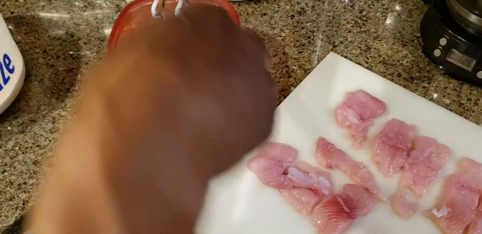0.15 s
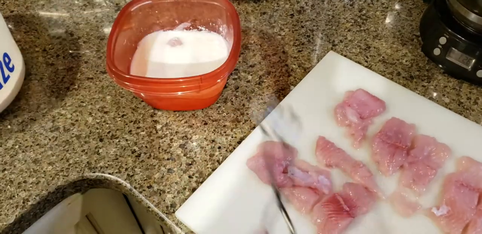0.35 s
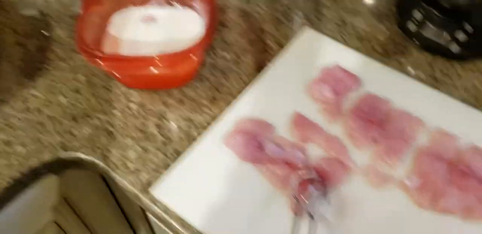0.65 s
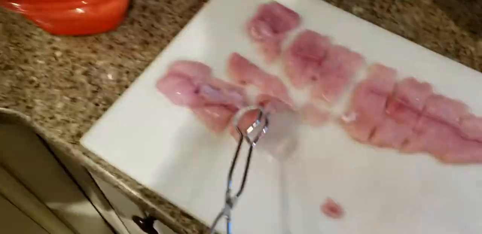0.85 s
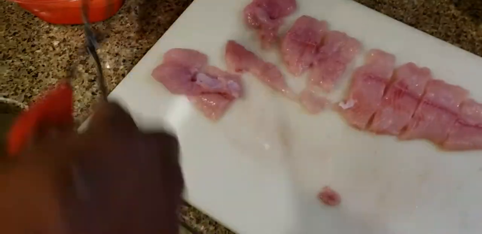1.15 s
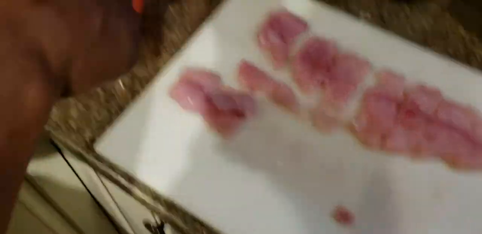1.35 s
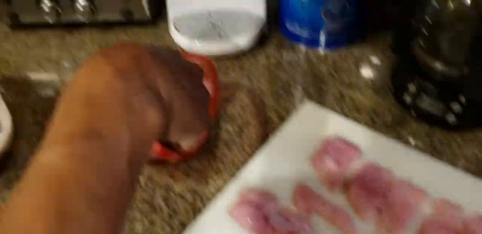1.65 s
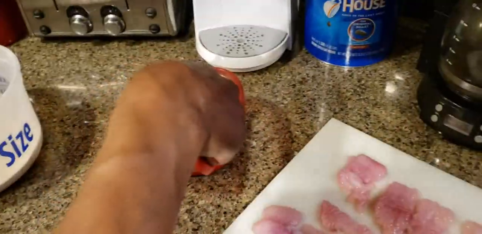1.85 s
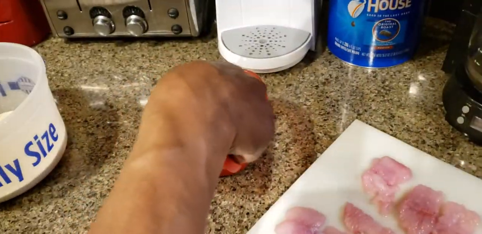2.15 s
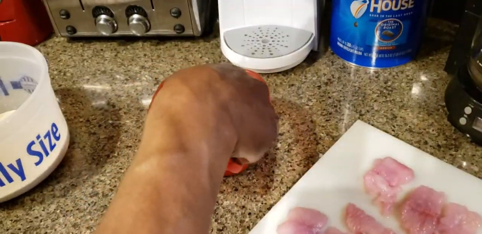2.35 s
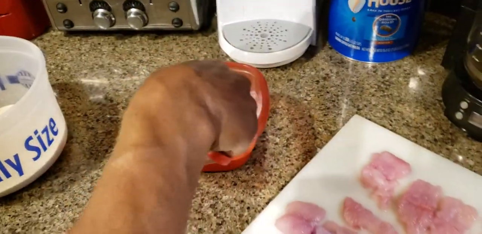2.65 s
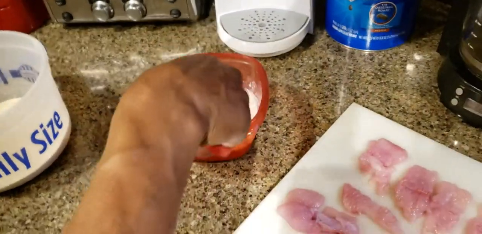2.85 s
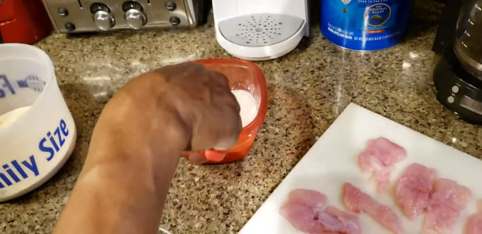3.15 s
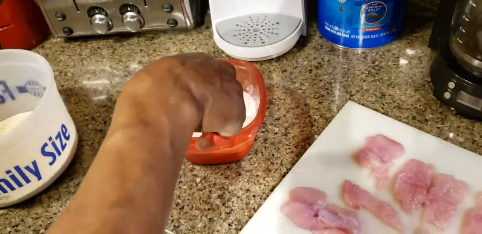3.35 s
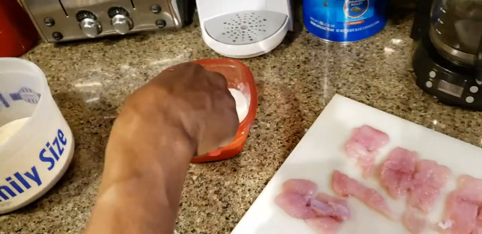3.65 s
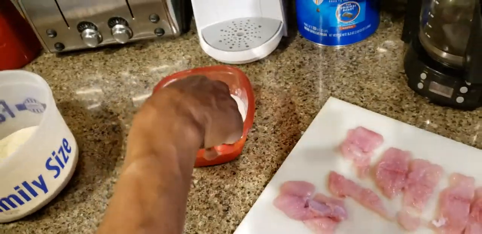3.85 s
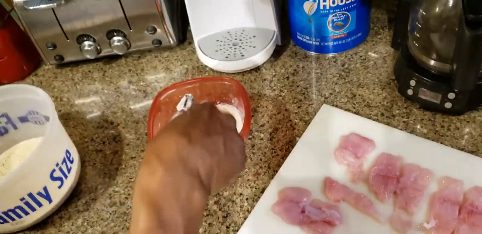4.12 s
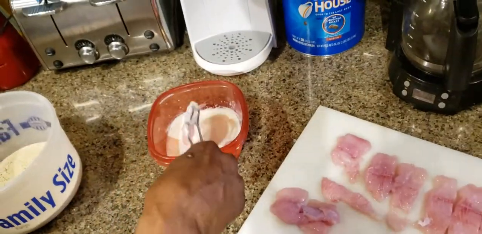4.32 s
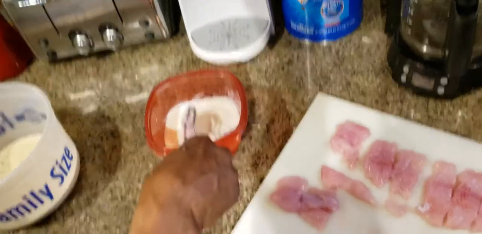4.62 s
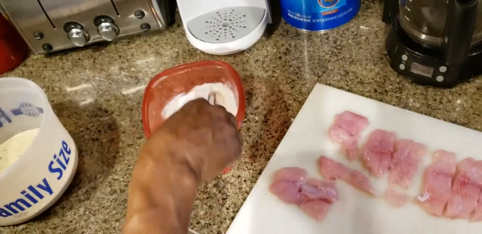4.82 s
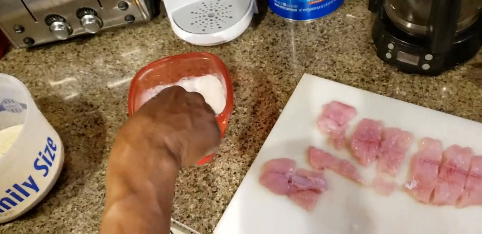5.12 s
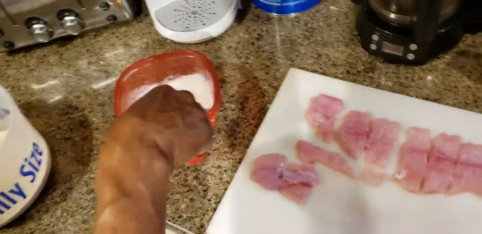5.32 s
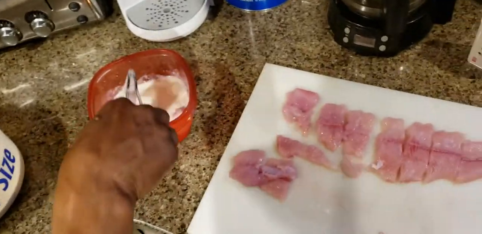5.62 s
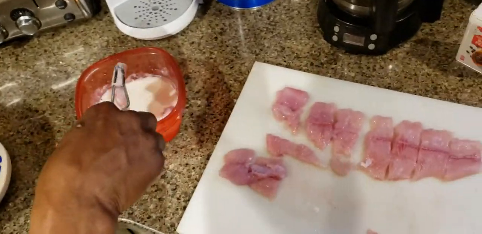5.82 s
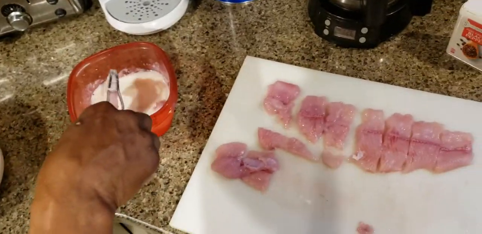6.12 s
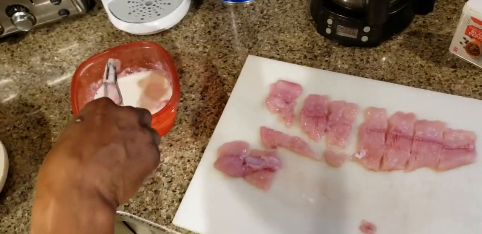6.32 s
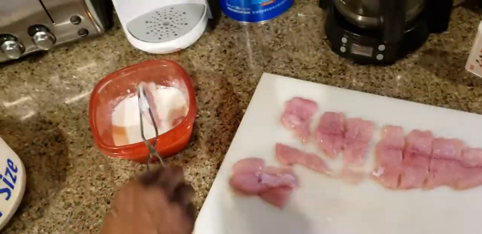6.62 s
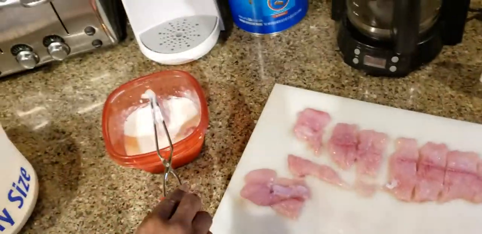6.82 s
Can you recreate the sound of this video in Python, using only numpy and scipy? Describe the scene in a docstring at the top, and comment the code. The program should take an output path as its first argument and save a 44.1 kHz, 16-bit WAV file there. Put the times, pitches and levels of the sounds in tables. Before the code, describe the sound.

Metal tongs clack and judder on a cutting board, then tap a plastic bowl, over a steady low refrigerator hum in a small kitchen.

```python
"""Metal tongs pick wet fish off a cutting board and turn it in a plastic bowl of flour on a stone counter.
Board, bowl and hinge sound as damped modes under a chatter of steel; low swings make the bumps and knocks.
Band-limited bursts make the wet smacks, a scrape, ticks, crackles and a metallic ting; shaped noise makes
the fish slide and fingers rub the hand-held phone. A refrigerator, built from sines and narrow noise bands,
hums over low room air; the blows and friction excite the echoes of a small, hard kitchen."""
import sys
import numpy as np
from scipy import signal
from scipy.fft import rfft, irfft, next_fast_len
from scipy.io import wavfile
from scipy.ndimage import uniform_filter1d

SR = 44100
rng = np.random.default_rng(int(sys.argv[2]) if len(sys.argv) > 2 else 0)


def digitize_waveform(pressure):
    """Quantize a signal to 16-bit integers and store it at the path in sys.argv[1].

    Rows of a 2-D input are taken as channels; values are limited to [-1, 1].
    """
    field = np.atleast_2d(pressure).T
    bounded = np.clip(field, -1, 1)
    quanta = np.round(bounded * 32767).astype(np.int16)
    wavfile.write(sys.argv[1], SR, quanta)


N = 307377
TIME = np.arange(N) / SR
BLOW = TIME[:SR // 3]  # time axis of one blow [s]
HALF_SECOND = TIME[:SR // 2]  # time axis of echoes and strokes [s]

# Event levels are those of the direct sound before the room; pan is left minus right.
# Spectrum of the room air: (frequency [Hz], relative density [dB])
AIR_SPECTRUM = [(20, -11.5), (45, -0.5), (85, 9), (140, -4.5), (220, -6), (330, -4.5), (400, -15.5),
                (550, -10.5), (700, -21), (950, -24), (1400, -31.5), (5000, -35.5), (9000, -42),
                (11500, -31), (15000, -32)]
AIR_DB = -61.5

# Motor overtones that stay even across the room: (multiple of the motor rate, level [dB rms])
DRONE_LINES = [(2, -87.5), (3, -71), (4, -82), (6, -88.5), (9, -77.5), (10, -83), (11, -94), (16, -88),
               (19, -88.5)]
# Refrigerator lines that fade as the phone moves: (multiple of the motor rate, level relative to the whine [dB])
WHINE_LINES = [(2, 1), (8, 2), (9.5, -12), (15, -11.5), (17, -15.5), (18, -29)]
# Fading of the whine as the phone moves along the counter: (time [s], level [dB])
WHINE_LEVEL = [(0, -66.3), (2.8, -68), (3.35, -70.5), (4.1, -76), (6.9, -82)]
# Bands of refrigerant hiss: (centre [Hz], width [Hz], level [dB rms])
HISS_BANDS = [(6273, 100, -84.5), (6870, 760, -79.5)]
# Swells of the refrigerant whistle: (time [s], rise [dB])
WHISTLE_SWELLS = [(0.329, 9.5), (3.05, 12.5)]
MOTOR_HZ, MOTOR_DB, MOTOR_SWAY_DB = 58.17, -39, 0.8  # sway is the drift of the deep line
WHISTLE_HZ, WHISTLE_BAND_HZ = 3475, 70
WHISTLE_DB, WHISTLE_SWELL_S = -87.5, 0.13  # level at rest; standard deviation of a swell

# Fingers rubbing the phone: (time [s], rise [s], hold [s], fade [s], level [dB], treble [dB], pan [dB])
RUBS = [(2.769, .0015, 0.022, 0.061, -51.5, -12.5, -10), (3.419, 0.04, 0.045, 0.029, -51, -16.5, -5),
        (3.496, 0.021, .052, 0.011, -45.5, -18.5, -13.5), (3.587, 0.0018, 0.031, 0.045, -54.5, -10.5, -12)]
# Spectrum of skin on the case: (frequency [Hz], gain [dB])
RUB_SPECTRUM = [(100, 18), (300, 7.5), (900, 1.5), (2200, -9), (3200, 5), (6500, 11), (8500, 9),
                (12500, 14.5), (16000, 12.5)]
# Short slips of a stuttering fingertip: (time [s], level [dB])
STUTTER = [(4.148, -53), (4.177, -46.5), (4.2101, -46.5), (4.2432, -48), (4.291, -52)]
SLIP_RISE_S, SLIP_HOLD_S, SLIP_FADE_S = 0.0013, 0.0075, 0.0062
SLIP_TREBLE_DB, SLIP_PAN_DB = -2, -27
# Finger knocks on the phone: (time [s], level [dB], pan [dB])
KNOCKS = [(2.758, -40, -9), (2.774, -32, -22), (3.588, -32, -20)]
KNOCK_HZ, KNOCK_DECAY_S = 171, 0.003

# Bumps of the bowl on the counter: (time [s], level [dB], pitch [Hz])
BUMPS = [(3.262, -35, 212), (3.274, -32.5, 69.8), (6.745, -35, 101.6)]
BUMP_DECAY_S, BUMP_PAN_DB = 0.046, 3.5
# After each tap the bowl rocks back onto the counter; its level is relative to the tap.
THUD_LAG_S, THUD_DB, THUD_HZ, THUD_DECAY_S = 0.027, -16.5, 159.4, 0.039

# Fish and tongs sliding in flour: (time [s], rise [s], hold [s], fade [s], level [dB], treble [dB], pan [dB])
SLIDES = [(1.257, 0.0047, 0.033, 0.047, -63.5, 15, 15), (1.29, .026, 0.018, .035, -71, -45, 15),
          (1.416, 0.0013, 0.039, 0.041, -46.5, 1.5, -1), (1.82, 0.044, 0.071, 0.018, -81.5, -34, 4),
          (3.262, 0.002, 0.032, 0.09, -66, 8.5, -3), (3.80, 0.02, 0.1, 0.17, -69.5, 28, -17),
          (5.343, .003, 0.01, 0.034, -73.5, 18.5, -9)]
# Spectrum of the sliding: (frequency [Hz], gain [dB])
SLIDE_SPECTRUM = [(200, -21), (700, 0), (1300, 7.5), (2000, 6.5), (3200, 5.5), (4500, 2), (6800, 6.5),
                  (8500, -7.5), (12000, -2.5), (16000, -9.5)]
CRUMB_DB, CRUMB_SCATTER_DB, CRUMB_HZ = -77.5, 2, 3240
DIPPING_S = (1.7, 6.4)  # the fish is dipped between these times

# Wet smacks of the fish, and a short scrape just before the first bowl tap:
# (time [s], level [dB], centre [Hz], decay [s], pan [dB])
SMACKS_AND_SCRAPE = [(.719, -55, 8000, 0.00094, 3), (.791, -51.5, 6730, 0.0012, 3),
                     (.804, -51.5, 9250, 0.0034, -8), (.839, -52.5, 8600, .0013, 3),
                     (1.539, -53, 9300, 0.0035, -9), (4.570, -49, 7130, 0.0045, 21)]
SMACK_OCTAVES, SMACK_ROOM_DB = 0.43, -19.5
# Light ticks of the steel arms: (time [s], level [dB], centre [Hz], pan [dB])
TICKS = [(2.256, -71.5, 4080, 0), (2.694, -61, 2010, 2), (2.755, -60.5, 3460, -18),
         (2.774, -58, 3330, -20.5), (3.304, -59.5, 4230, 9), (3.325, -58, 5160, 0), (5.1, -60, 2550, 18),
         (6.149, -64.5, 2650, 15)]
TICK_OCTAVES, TICK_DECAY_S, TICK_ROOM_DB = 0.12, 0.0032, -16.5
# Bands of a metallic ting of the steel: (centre [Hz], width [octaves], level [dB], decay [s])
TING_BANDS = [(14300, .085, -2, .005), (8600, 0.6, -4.5, 0.0028), (5580, 0.09, -8, 0.0066)]
TING_S, TING_DB, TING_PAN_DB = 3.4367, -36, -6

# Dry clicks of the tongs' hinge: (time [s], level [dB], treble [dB])
HINGE_CLICKS = [(3.845, -51.5, -11.5), (5.629, -47.5, 8.5), (5.682, -50, 1)]
# Modes of the hinge: (frequency [Hz], level [dB], T60 [s])
HINGE_MODES = [(226, -6.5, 0.02), (1970, -2.5, 0.015), (3120, -9, 0.0044), (4220, 2, 0.0088),
               (7260, 9.5, 0.0054), (13000, 7, 0.0008)]
# Spectrum of the hinge's contact noise: (frequency [Hz], gain [dB])
HINGE_CRACK = [(300, 9), (2500, -3), (5000, -5), (9000, -6), (16000, -2.5)]

# Tongs on the bowl: (time [s], level [dB], treble [dB], contact [s], spot pitch [Hz], spot ring [dB])
BOWL_TAPS = [(4.593, -40.5, -11, 0.011, 1014, 1.5), (4.744, -31, 1, 0.022, 886, 5.5),
             (4.786, -38, 0, 0.0057, 550, -4), (6.7197, -31, -7, 0.0029, 1230, -11.5),
             (6.749, -38, -6, 0.0023, 1270, -3), (6.9038, -27.5, 6.5, 0.00084, 1730, -17)]
# Heavily damped modes of the bowl wall: (frequency [Hz], level [dB], T60 [s])
BOWL_MODES = [(335, -3, 0.03), (445, -6, 0.073), (570, -10, 0.12), (764, -2.5, 0.015), (1030, -0.5, 0.048),
              (1240, -17, 0.046), (1680, -8, 0.072), (2070, -10, 0.026), (3150, -3, 0.0033),
              (3580, -7, 0.015), (4350, -8, 0.0021), (6550, 1, 0.0063)]
# Spectrum of steel contact on plastic: (frequency [Hz], gain [dB])
BOWL_CRACK = [(100, -8), (400, 2.5), (1500, 6), (2500, -19), (3300, -1.5), (6800, -7), (8500, -16),
              (12500, -18.5), (16000, -31)]
# The other tip lands just after the first, weaker and duller.
SECOND_TIP_S, SECOND_TIP_DB, SECOND_TIP_TREBLE_DB = 0.0057, -12, -29

# Tongs on the cutting board: (time [s], level [dB], contact [s], judder [dB relative to the blow])
BOARD_HITS = [(0.5651, -23, .003, -12), (.579, -36.5, .008, -15), (.614, -35, .017, -4),
              (.650, -36.5, 0.0061, 0), (.667, -33, 0.014, 4.5), (.734, -40.5, 0.0043, -1),
              (0.747, -46, 0.0071, 3)]
# Modes of board and tongs together: (frequency [Hz], level [dB], T60 [s])
BOARD_MODES = [(863, -11.5, 0.022), (1070, -10.5, 0.028), (1415, 10.5, 0.047), (1927, 11, 0.019),
               (2078, 11.5, 0.06), (2240, -4, .035), (2900, 3.5, 0.047), (3155, 17.5, 0.014),
               (3487, -0.5, 0.0346), (4100, -5.5, .025), (4250, 3.5, .025), (5000, -12, 0.017),
               (6300, -19.5, .015)]
# Spectrum of steel contact on the board: (frequency [Hz], gain [dB])
BOARD_CRACK = [(100, -25.5), (300, -4), (550, -14), (1500, 0.5), (3900, 2), (6000, -13), (8300, -40.5),
               (16000, -52)]
# Treble of the first clack; later ones dull as the tips sink into the fish.
BOARD_TREBLE_DB, DULLING_DB_PER_S, BOARD_EDGE_HZ = -3, 104, 7200

ROOM_T60_S, ROOM_TREBLE_T60_S = 0.29, 0.26
TOP_HZ = 15950


def undb(db):
    """Logarithmic level: decibels become an amplitude gain."""
    return 10 ** (np.asarray(db) / 20)


def unit(x):
    """Mean power: scale to rms 1."""
    return x / np.sqrt(np.mean(x ** 2))


def burst(x, db):
    """Energy of a transient: scale a blow so that its energy, packed into 10 ms, has this level."""
    return x * undb(db) * np.sqrt(SR / 100 / np.sum(x ** 2))


def shape(x, gain):
    """Linear filtering: multiply the spectrum by a gain that is a function of frequency."""
    size = next_fast_len(x.shape[-1])
    hz = np.maximum(np.fft.rfftfreq(size, 1 / SR), 1)
    return irfft(rfft(x, size) * gain(hz), size)[..., :x.shape[-1]]


def colour(points):
    """Spectral envelope: gain interpolated over log frequency through (Hz, dB) points."""
    hz, db = np.transpose(points)
    return lambda f: undb(np.interp(np.log(f), np.log(hz), db))


def shelf(f, treble_db, corner_hz):
    """Shelving filter: the gain lifts or lowers everything above a corner."""
    return undb(treble_db / (1 + (corner_hz / f) ** 4))


def noise(size, gain, apart_hz=500):
    """Spatial coherence: noise at two microphone ports is alike in the bass, unrelated in the treble."""
    mid, side = shape(rng.standard_normal((2, size)), gain)
    side = shape(side, lambda f: f / np.hypot(f, apart_hz))
    return unit(np.array([mid + side, mid - side]))


def walk(rate):
    """Slow random modulation: straight lines join `rate` Gaussian values per second."""
    knots = rng.standard_normal(int(rate * N / SR) + 2)
    return np.interp(TIME * rate, np.arange(len(knots)), knots)


def pan(db):
    """Intensity stereo: left and right gains of constant total power."""
    return unit(undb(np.array([[db], [-db]]) / 2))


def add(track, s, x):
    """Superposition: mix a sound in at time s."""
    start = int(s * SR)
    track[..., start:start + x.shape[-1]] += x[..., :N - start]


def ports(x, lag_s):
    """Arrival-time difference: direct sound reaches the right port a little after the left."""
    return np.array([x, shape(x, lambda f: np.exp(-2j * np.pi * f * lag_s))])


def even(x, size):
    """Spectral whitening: level a burst over `size` bins, so it spreads sound in time without colouring it."""
    spectrum = rfft(x, 2 * x.shape[-1])
    power = uniform_filter1d(np.abs(spectrum) ** 2, size=size)
    return irfft(spectrum * np.sqrt(power.mean() / power))[..., :x.shape[-1]]


def kitchen(x, tail_db, early_db, early_s=0.0043, gap_s=0.0022):
    """Reverberation: quick echoes off counter and appliances, then a tail whose treble dies first."""
    t = HALF_SECOND
    low = noise(len(t), lambda f: 1 / np.hypot(1, f / 4000))
    high = noise(len(t), lambda f: f / np.hypot(f, 4000))
    tail = 0.5 * low * undb(-60 * t / ROOM_T60_S)
    tail += 0.62 * high * undb(-60 * t / ROOM_TREBLE_T60_S)
    early = noise(len(t), np.ones_like) * np.exp(-t / early_s)
    onset = 1 - np.exp(-t / gap_s)
    echo = (undb(tail_db) * unit(tail) + undb(early_db) * unit(early)) * onset / np.sqrt(len(t))
    return signal.fftconvolve(x[None], even(echo, size=140), axes=1)[:, :N]


def ring(modes, treble_db):
    """Modal synthesis: a sum of damped modes, slightly retuned by every blow."""
    out = 0
    for hz, db, t60 in modes:
        struck_hz = hz * (1 + 0.011 * rng.standard_normal())
        mode = np.sin(2 * np.pi * struck_hz * BLOW) * undb(-60 * BLOW / t60)
        out = out + rng.choice([-1, 1]) * burst(mode, db) * shelf(hz, treble_db, 2300)
    return out * (1 - np.exp(-BLOW / 0.0001))


def strike(modes, crack, crack_db, treble_db, contact_s):
    """Impact excitation: the steel chatters for a moment while the modes ring."""
    contact = even(rng.standard_normal(len(BLOW)) * np.exp(-BLOW / contact_s), size=100)
    chatter = shape(contact, lambda f: colour(crack)(f) * shelf(f, treble_db, 2100))
    chatter = chatter * np.exp(-BLOW / 0.03)
    return burst(burst(ring(modes, treble_db), 0) + burst(chatter, crack_db), 0)


def thump(db, hz, decay_s):
    """Damped low-frequency oscillation: a low swing and a rumble around it die away."""
    rumble = noise(len(BLOW), lambda f: f / np.hypot(f, 60) / np.hypot(1, (f / (1.44 * hz)) ** 3))
    body = unit(np.sin(2 * np.pi * hz * BLOW) + undb(-1.5) * rumble)
    return undb(db) * body * np.exp(-BLOW / decay_s) * (1 - np.exp(-BLOW / 0.0012))


def pops(events, room_db):
    """Band-limited transients: rows of (time [s], level [dB], centre [Hz], octaves, decay [s], pan [dB])."""
    out, send = np.zeros((2, N)), np.zeros(N)
    for s, db, hz, octaves, decay_s, pan_db in events:
        band = noise(len(BLOW), lambda f: 1 / (1 + (np.log2(f / hz) / octaves) ** 2 / 2) ** 2)
        pop = band * np.exp(-BLOW / decay_s)
        add(out, s, pan(pan_db) * burst(pop, db))
        add(send, s, burst(pop[0], db + room_db))
    return out + kitchen(send, tail_db=8.5, early_db=13)


def friction(strokes, spectrum, grain_db, corner_hz):
    """Friction noise: strokes of dense slips whose strength varies at random."""
    out, t = np.zeros((2, N)), HALF_SECOND
    for s, rise_s, hold_s, fade_s, db, treble_db, pan_db in strokes:
        grain = unit(uniform_filter1d(rng.standard_normal(len(t)), size=50))
        slips = unit(undb(grain_db * grain))
        pressure = np.minimum(t / rise_s, 1) * np.exp(-np.maximum(t - rise_s - hold_s, 0) / fade_s)
        hiss = noise(len(t), lambda f: colour(spectrum)(f) * shelf(f, treble_db, corner_hz))
        add(out, s, pan(pan_db) * undb(db) * pressure * slips * hiss)
    return out


def air():
    """Diffuse broadband noise: low room rumble, stronger on the left, under an even hiss."""
    room = noise(N, colour(AIR_SPECTRUM)) * undb(AIR_DB + 0.67 * walk(2.6))
    return shape(room, lambda f: undb(np.array([[1], [-1]]) * 1.6 / np.hypot(1, f / 2500)))


def fridge():
    """Periodic excitation and jet noise: a compressor's wavering lines, a thin refrigerant hiss and whistle."""
    turns = np.cumsum(MOTOR_HZ * (1 + 0.000602 * walk(1.76))) / SR
    hum = np.sin(2 * np.pi * turns) * undb(MOTOR_DB + MOTOR_SWAY_DB * walk(3.2))
    whine_db = np.interp(TIME, *np.transpose(WHINE_LEVEL))
    for lines, base_db in ((DRONE_LINES, 0), (WHINE_LINES, whine_db)):
        for multiple, db in lines:
            line = np.sin(2 * np.pi * (multiple * turns + rng.random()))
            hum += line * undb(base_db + db + 2.0 * walk(6))
    whistle_db = np.full(N, float(WHISTLE_DB))
    for s, rise_db in WHISTLE_SWELLS:
        whistle_db += rise_db * np.exp(-((TIME - s) / WHISTLE_SWELL_S) ** 2 / 2)
    jets = np.zeros((2, N))
    for hz, width, db in [*HISS_BANDS, (WHISTLE_HZ, WHISTLE_BAND_HZ, whistle_db)]:
        band = noise(N, lambda f: 1 / (1 + (2 * (f - hz) / width) ** 2))
        jets += band * undb(db + 0.8 * walk(1.844))
    return pan(3.8) * np.sqrt(2) * hum + jets  # sqrt(2) turns sine amplitude into rms


def fingers():
    """Stick-slip friction: skin on the phone's case, near the right port, in long rubs and then a stutter."""
    slips = [(s, SLIP_RISE_S, SLIP_HOLD_S, SLIP_FADE_S, db, SLIP_TREBLE_DB, SLIP_PAN_DB) for s, db in STUTTER]
    dry = friction(RUBS + slips, RUB_SPECTRUM, grain_db=2.0, corner_hz=6340)
    return dry + kitchen(dry.mean(axis=0), tail_db=-12, early_db=-18)


def thumps():
    """Impact of dull bodies: the bowl bumps on the counter and thuds after each tap; fingers knock the phone."""
    out = np.zeros((2, N))
    for s, db, hz in BUMPS:
        add(out, s, pan(BUMP_PAN_DB) * thump(db, hz, BUMP_DECAY_S))
    for s, db, *_ in BOWL_TAPS:
        add(out, s + THUD_LAG_S, pan(BUMP_PAN_DB) * thump(db + THUD_DB, THUD_HZ, THUD_DECAY_S))
    for s, db, pan_db in KNOCKS:
        add(out, s, pan(pan_db) * thump(db, KNOCK_HZ, KNOCK_DECAY_S))
    return out


def crumbs(count=6, octaves=0.39, decay_s=0.0016):
    """Random impulses: damp flour crackles faintly while the fish is dipped."""
    times = rng.uniform(*DIPPING_S, count)
    chance = rng.standard_normal((count, 3))
    crackles = [(s, CRUMB_DB + CRUMB_SCATTER_DB * a, CRUMB_HZ * 2 ** (b / 2), octaves, decay_s, 4 * c)
                for s, (a, b, c) in zip(times, chance)]
    return pops(crackles, room_db=-8)


def flour():
    """Sliding friction: fish slides into the flour and is pushed about."""
    dry = friction(SLIDES, SLIDE_SPECTRUM, grain_db=5.0, corner_hz=5050)
    return dry + pan(4.8) * kitchen(dry.mean(axis=0), tail_db=5, early_db=9)


def smacks_and_scrape():
    """Rupture of liquid films as the fish peels off board and tongs; a short scrape precedes the bowl taps."""
    bursts = [(s, db, hz, SMACK_OCTAVES, decay_s, pan_db) for s, db, hz, decay_s, pan_db in SMACKS_AND_SCRAPE]
    return pops(bursts, SMACK_ROOM_DB)


def ticks():
    """Light impact: the steel arms tick in narrow bands as they turn the fish."""
    taps = [(s, db, hz, TICK_OCTAVES, TICK_DECAY_S, pan_db) for s, db, hz, pan_db in TICKS]
    return pops(taps, TICK_ROOM_DB)


def ting():
    """Bright impact: a metallic ting of the steel in several bands, each with its own decay."""
    bands = [(TING_S, TING_DB + db, hz, octaves, decay_s, TING_PAN_DB)
             for hz, octaves, db, decay_s in TING_BANDS]
    return pops(bands, room_db=-12.0)


def hinge():
    """Near-field impact: the hinge clicks close to the phone, with almost no room."""
    dry = np.zeros(N)
    for s, db, treble_db in HINGE_CLICKS:
        click = strike(HINGE_MODES, HINGE_CRACK, -8.5, treble_db, contact_s=0.00045)
        add(dry, s, burst(click, db))
    echo = kitchen(dry, tail_db=-12, early_db=-12)
    return pan(-9.0) * (ports(dry, lag_s=0.00003) + echo)


def bowl():
    """Damped wall modes: tongs tap the plastic, bare steel brighter than a floury tip, each spot with its pitch."""
    out = np.zeros((2, N))
    for s, db, treble_db, contact_s, spot_hz, spot_db in BOWL_TAPS:
        dry = np.zeros(N)
        spot = burst(ring([(spot_hz, 0, 0.03)], 0), spot_db)
        first = strike(BOWL_MODES, BOWL_CRACK, 0.99, treble_db, contact_s) + spot
        second = strike(BOWL_MODES, BOWL_CRACK, -2.5, treble_db + SECOND_TIP_TREBLE_DB, contact_s)
        add(dry, s, burst(first, db))
        add(dry, s + SECOND_TIP_S, burst(second, db + SECOND_TIP_DB))
        # every tap gets its own echoes
        out += undb(-5.0) * ports(dry, lag_s=0.0001) + kitchen(dry, tail_db=-5.5, early_db=1.5)
    # a gentle dip around 8.7 kHz softens the taps
    return pan(5.8) * shape(out, lambda f: undb(-7 * np.exp(-((f - 8700) / 1000) ** 2)))


def board():
    """Impact and driven resonance: tongs clack on the board and judder over it as they close on the fish."""
    out = np.zeros((2, N))
    first_s = BOARD_HITS[0][0]
    for s, db, contact_s, judder_db in BOARD_HITS:
        dry = np.zeros(N)
        treble_db = BOARD_TREBLE_DB - DULLING_DB_PER_S * (s - first_s)
        # dragging steel feeds the board's broad main resonance, which swells and fades
        resonance = noise(len(BLOW), lambda f: 1 / (1 + ((f - 1270) / 240) ** 2))[0]
        judder = resonance * BLOW * np.exp(-BLOW / 0.0023)
        clack = strike(BOARD_MODES, BOARD_CRACK, 2.8, treble_db, contact_s)
        add(dry, s, burst(clack + burst(judder, judder_db), db))
        out += undb(-6) * ports(dry, lag_s=0.00011) + kitchen(dry, tail_db=-6.0, early_db=-1.0)
    # a low-pass rounds off the top of the clacks
    top_cut = signal.butter(6, BOARD_EDGE_HZ, fs=SR, output="sos")
    return pan(3.5) * signal.sosfilt(top_cut, out)


def scene():
    """Superposition of everything on and around the counter."""
    background = air() + fridge()
    contents = crumbs() + flour() + smacks_and_scrape()
    tongs = ticks() + ting() + hinge() + bowl() + board()
    return background + fingers() + thumps() + contents + tongs


def record(dry):
    """Band limitation: the phone cuts the top with a steep elliptic low-pass."""
    return signal.sosfilt(signal.ellip(10, 0.2, 80, TOP_HZ, fs=SR, output="sos"), dry)


dry = scene()
out = record(dry)
digitize_waveform(out)
```